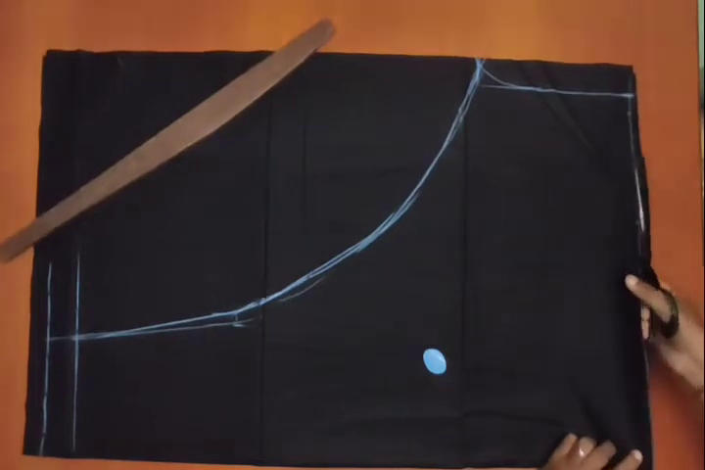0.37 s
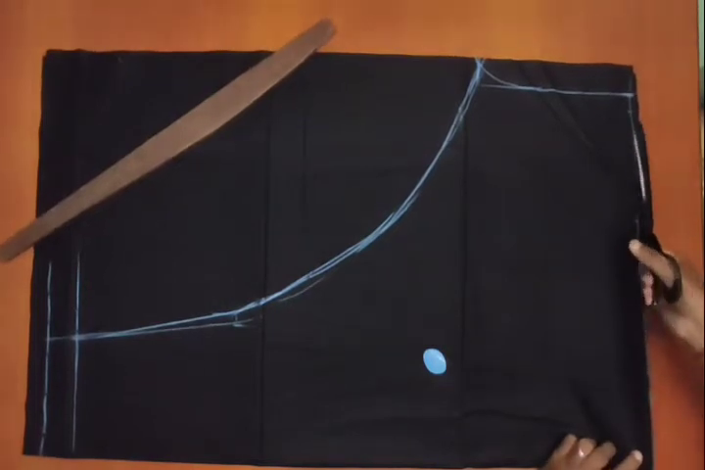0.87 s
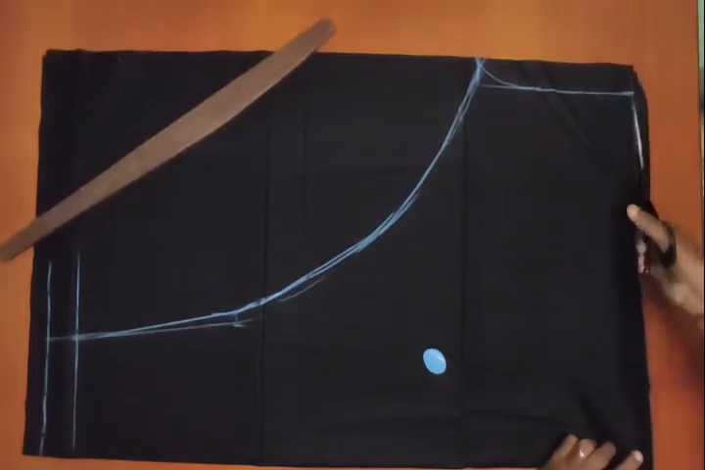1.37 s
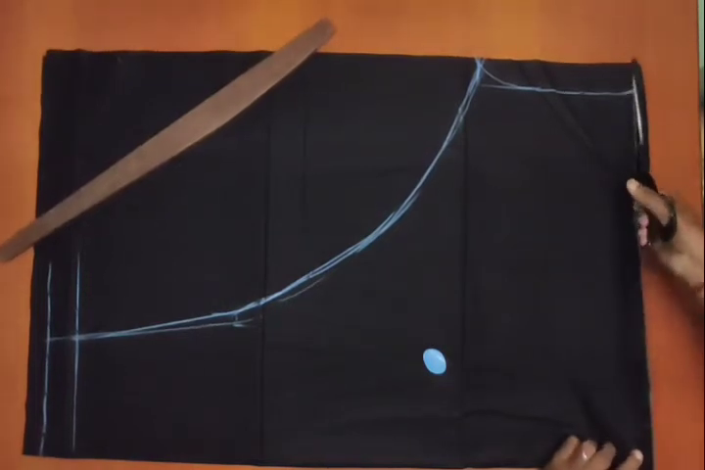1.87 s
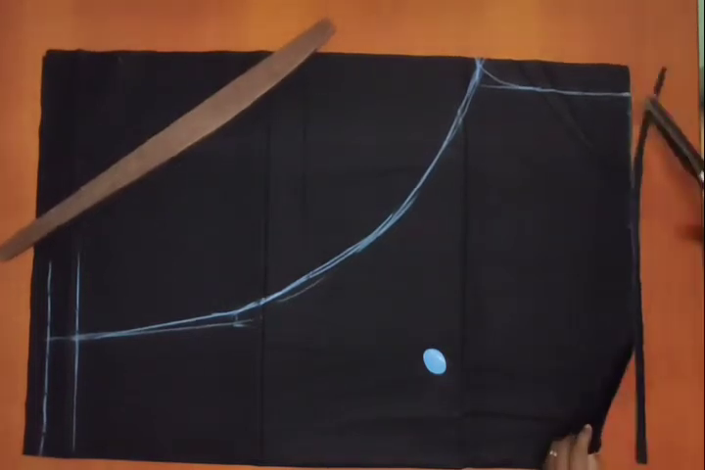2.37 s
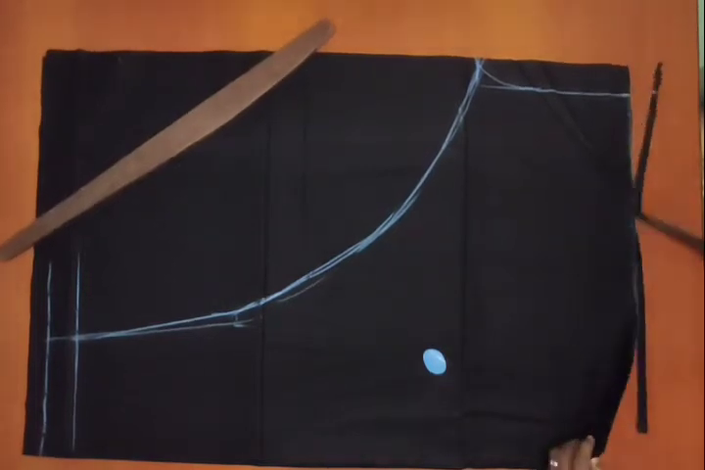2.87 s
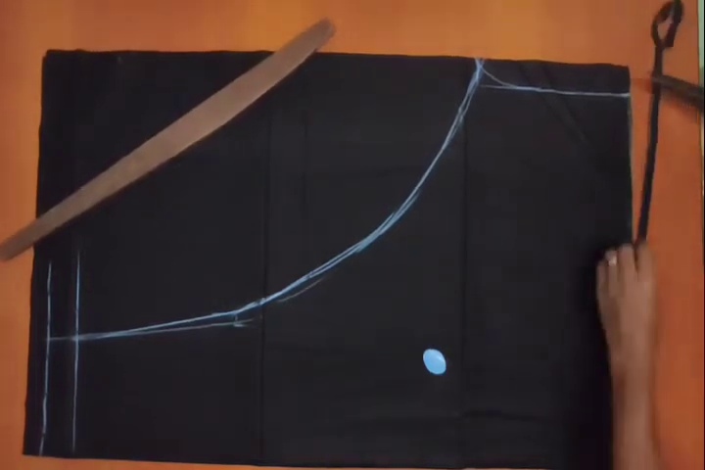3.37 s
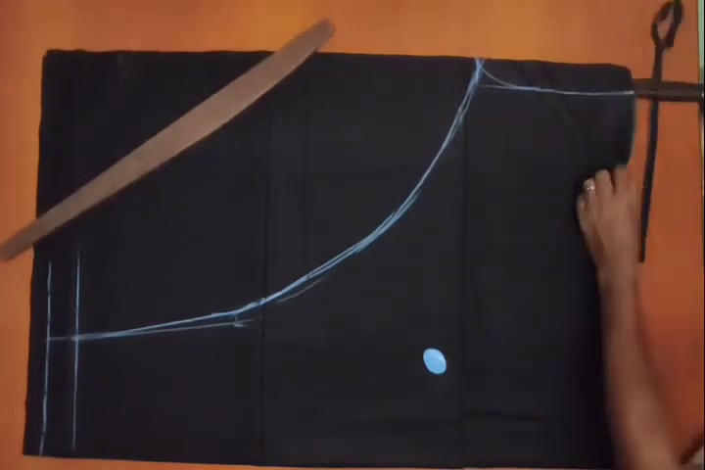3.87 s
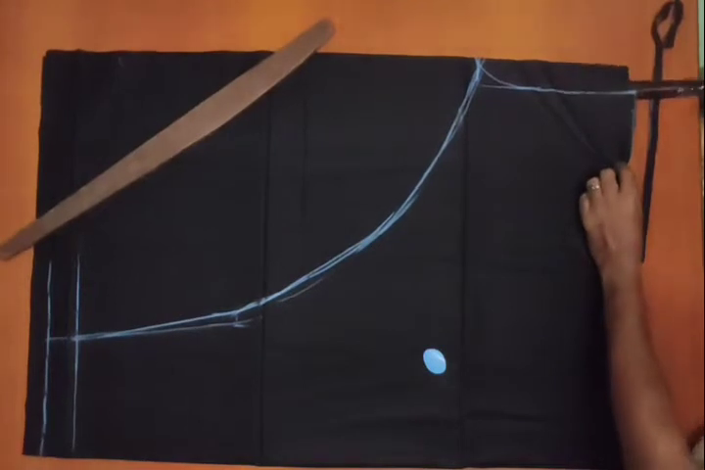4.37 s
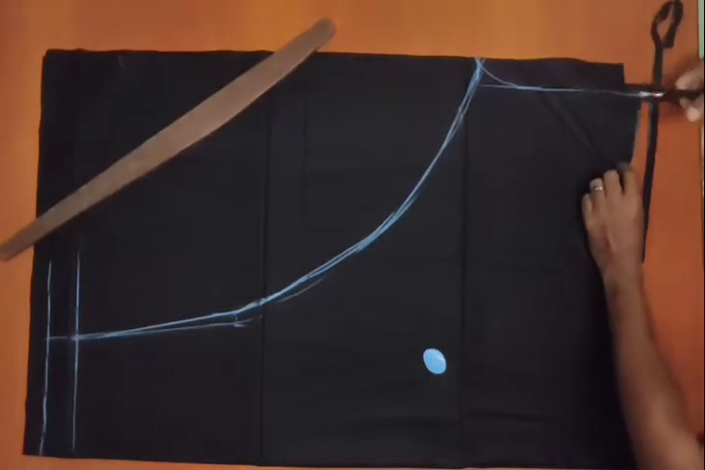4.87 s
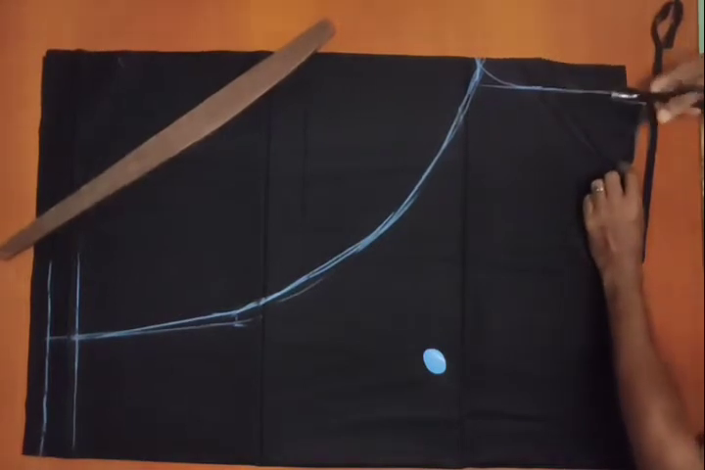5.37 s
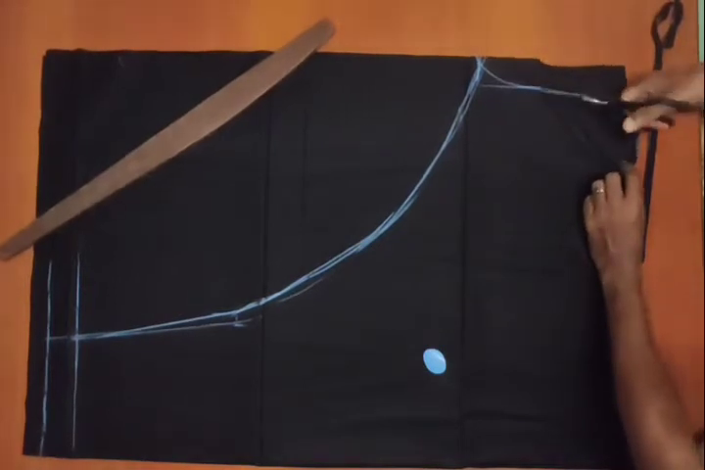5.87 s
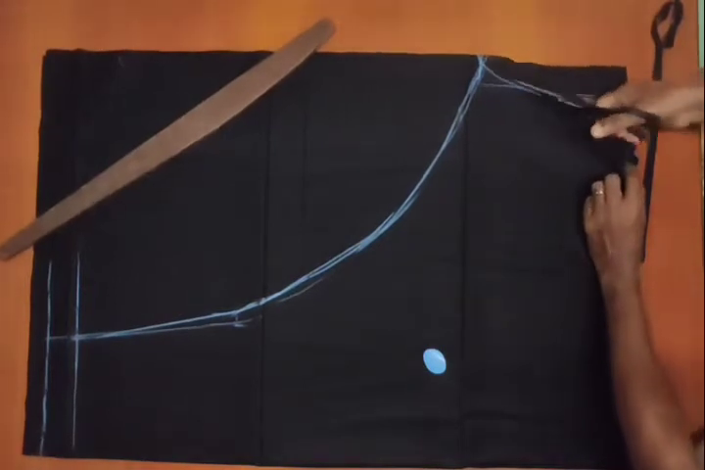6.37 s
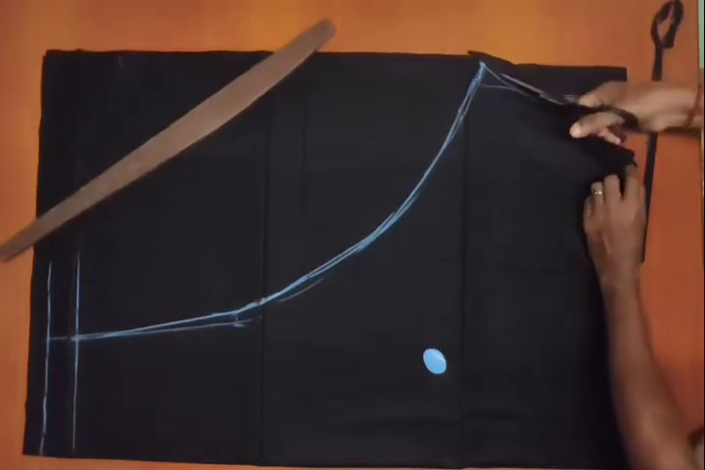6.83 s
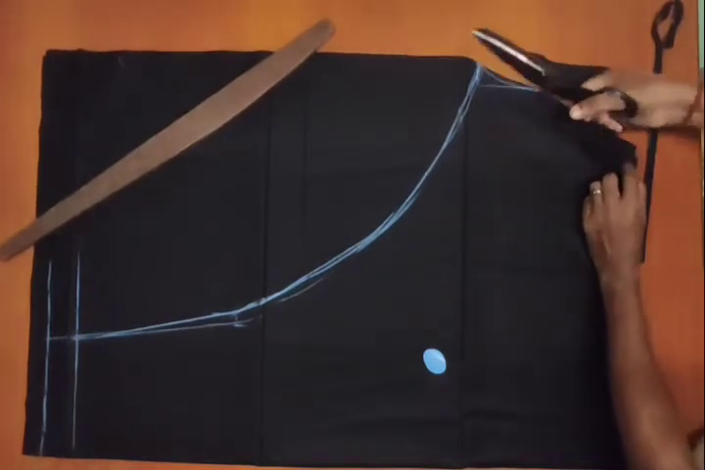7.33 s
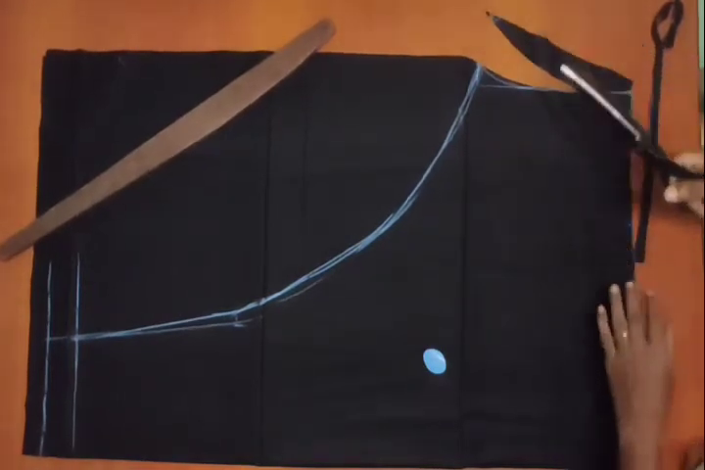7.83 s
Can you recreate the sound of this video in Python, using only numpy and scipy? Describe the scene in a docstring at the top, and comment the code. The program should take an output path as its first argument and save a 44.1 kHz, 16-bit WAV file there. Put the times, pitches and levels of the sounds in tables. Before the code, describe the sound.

In a small quiet room, steel scissors cut folded cloth while resting on a wooden table, heard from just above in stereo. From 0 to 2.1 s there are five short crunching cuts, at about 0.35, 0.8, 1.25, 1.7 and 2.05, each under a tenth of a second, with threads popping, blades hissing and lighter opening scrapes between most. Sharp snaps of tips on wood sound at 1.77 and, harder, 2.07. Cloth rustles from 2.1 to 2.9, with a bright clack at 2.64, then sparse ticks and small slides, and a knock at 3.76. From 4.2 the cuts resume every 0.45 s, woodier and heavier, with low table thumps and quiet scrapes between. The final cut at 7.3 ends in the loudest snap with a brief steel ping; a soft rustle fades into faint room tone and a barely audible steady hum.

```python
"""Steel scissors cut folded cloth, the lower blade resting on a wooden table, in a small quiet room.
Breaking threads shake the table modes through the blade; the blades hiss against each other and the cloth.
Tips snap shut as short blows: wood knocks, steel ticks, blade pings. The table also rocks on its legs.
Two spaced microphone ports listen from above, with a short room tail, room tone and a faint late tone."""
import sys
import numpy as np
from scipy import signal
from scipy.fft import rfft, irfft, next_fast_len
from scipy.io import wavfile
from scipy.ndimage import uniform_filter1d, map_coordinates

SR = 44100
rng = np.random.default_rng(int(sys.argv[2]) if len(sys.argv) > 2 else 0)


def store_wav(level_fs):
    """Save 16-bit WAV to argv[1]."""
    pcm = np.round(np.clip(np.atleast_2d(level_fs), -1, 1) * 32767)
    wavfile.write(sys.argv[1], SR, pcm.T.astype(np.int16))


def level_to_linear(level):
    """Convert decibel levels to linear amplitude factors, elementwise."""
    exponent = np.asarray(level, float) / 20
    return 10 ** exponent


N = 351477

# Levels in the tables are relative: filters, groups and the final balance act on top of them.
# Room tone spectrum, scaled as a whole later: centre_hz, level_db (per Hz)
ROOM_TONE = [(12, -4), (20, 13.5), (45, -2), (106, -7), (289, -4.5), (362, -10), (534, -8.5), (631, -11.5),
             (2470, -23), (4070, -27.5), (8880, -31.5), (11400, -84), (13100, -29), (15500, -68)]
# Likeness of the room tone at the two ports: freq_hz, likeness (0-1)
TONE_ALIKE = [(60, 0.1), (240, 0.67), (950, 0.067), (3770, 0.14), (15000, 0.68)]
# Hand and scissors resting on the table: time_s, force_db
REST = [(0, -50.5), (2.2, -55.5), (2.4, -100), (3.7, -83), (4.0, -51), (7.4, -67), (7.55, -76), (7.97, -62)]
# Share of the resting force in the four mode groups: level_db
REST_COLOUR = (-3.5, -14.5, -17.5, -21)
# Faint hiss of cloth brushing the blades between strokes: time_s, level_db
BRUSH = [(0.0, -71), (0.44, -77), (0.58, -68), (1.0, -71), (1.31, -63), (1.44, -66), (1.73, -57),
         (1.88, -72), (2.04, -72), (2.24, -66), (2.51, -77), (3.0, -62), (3.15, -76), (3.37, -67.5),
         (3.79, -63), (4.08, -65.5), (4.3, -68), (4.42, -69), (4.71, -66.5), (5.13, -63), (5.66, -81),
         (6.39, -68.5), (7.19, -81), (7.43, -73), (7.59, -75.5), (7.97, -62)]
# Steel and cloth sliding over the table:
# start_s, length_s, force_db, brightness_db, hiss_db, peak_share (of length), highest_modes_db
SLIDES = [(-0.03, 0.025, -38, 10.5, -51, 0.23, -21), (.26, 0.062, -56, 8.5, -64, 0.13, -2.5),
          (0.76, 0.023, -50, 9, -60, 0.69, -6), (1.16, 0.19, -60, 10, -83, 0.27, -4),
          (2.228, 0.059, -43, 11.5, -52, 0.83, -6.5), (2.908, 0.2, -43, 8, -45.5, 0.52, 7.5),
          (3.590, 0.12, -57, 9, -66, 0.22, -0.5), (3.778, 0.04, -39.5, 14.5, -56, 0.17, -7),
          (3.864, 0.11, -31.5, -21.5, -69, .75, 2), (4.0, 0.062, -46, -21, -67.5, 0.6, 0),
          (4.505, 0.051, -42, 0, -60.5, 0.12, 0), (4.955, 0.095, -38.5, -1, -64, .5, 5.5),
          (5.430, 0.032, -39.5, 2.5, -63.5, 0.17, 0.5), (5.865, 0.074, -42, 1, -66, 0.17, -1),
          (6.320, 0.074, -41.5, -9, -70.5, .2, 4.5), (6.755, 0.054, -41.5, -32, -67, 0.51, -4),
          (6.862, 0.029, -33.5, -9, -57, .2, -3), (7.297, 0.038, -32, -5, -32.5, 0.46, 14)]
# Blades opening again: start_s, length_s, force_db, brightness_db, hiss_db, peak_share (of length)
OPENINGS = [(0.068, 0.065, -45, 4, -47.5, 0.72), (0.520, 0.058, -46.5, 4, -50.5, .7),
            (0.976, 0.075, -53, 5.5, -51.5, 0.77), (1.428, 0.042, -51.5, -0.5, -50.5, 1),
            (4.412, 0.085, -40, -36, -53.5, 1), (4.890, 0.056, -39.5, 3.5, -52, 0.98),
            (5.333, 0.057, -40.5, 10, -51, 1), (5.765, 0.084, -41, 9.5, -55.5, 1),
            (6.208, 0.041, -38, 5, -53.5, 0.51), (6.662, 0.033, -39.5, 7, -52, 0.5),
            (7.095, 0.016, -43.5, -15, -51.5, 0.92)]
# Closing strokes through the cloth:
# start_s, length_s, force_db, brightness_db, hiss_db, peak_share (of length), bite_db (over the stroke)
CUTS = [(0.327, 0.084, -30.5, 11.5, -45, 0.55, -1.5), (0.786, 0.088, -32, -7.5, -44.5, 0.44, 6),
        (1.236, 0.091, -38.5, 12.5, -45, 0.44, 6.5), (1.701, 0.088, -30, 6, -45, 0.58, 4.5),
        (2.048, 0.066, -36, -0.5, -44.5, 0.43, 8), (4.225, 0.09, -31, -29, -45.5, 0.97, 0),
        (4.675, 0.086, -26.5, -5.5, -48, 0.84, -4.5), (5.105, 0.084, -29, 14.5, -42, 0.45, -1.5),
        (5.556, 0.069, -25, 6.5, -45, 0.44, -1.5), (6.008, 0.088, -29, 12, -44, 0.44, -4),
        (6.45, 0.068, -27.5, 3, -47.5, 0.53, 4.5), (6.884, 0.051, -31, -5.5, -48, 0.85, 9.5),
        (7.269, 0.077, -23, -4.5, -54, 0.46, 6.5)]
# Cloth rustling on the blades, clear of the table: start_s, length_s, hiss_db
RUSTLES = [(2.11, 0.11, -43.5), (2.402, 0.044, -44.5), (2.53, 0.05, -50.5), (2.662, 0.022, -37),
           (2.817, 0.14, -54.5), (3.527, 0.037, -45.5), (7.449, 0.13, -51)]
# Course of a stroke, wood row then hiss row: attack_s, start_db, end_db, release_db_per_s;
# the hiss row adds peak_share (of length). Attack and share are limited in course().
SLIDE_SHAPE = (-0.03, -5.5, -6.5, 400), (-0.05, 0, 1.5, 331, 15)
OPEN_SHAPE = (0.1, -4, -6, 440), (-0.8, -1.5, -9, 138, 0.56)
CUT_SHAPE = (0.05, -15.5, -4, 402), (-0.05, -3.5, 1.5, 491, 3.7)
# Course of a rustle, one row with the hiss columns
RUSTLE_SHAPE = (-0.9, -11.5, -8.5, 268, .5)
# Share of the force in the four mode groups, a row near the side edge, a row across the cloth: level_db
SLIDE_COLOUR = (0, 3.5, -1.5, -4.5), (0, -4, -7, -8)
OPEN_COLOUR = (0, 10, 1.5, -10.5), (0, -6, -10.5, -23.5)
CUT_COLOUR = (0, 1, -9, -29.5), (0, -2, -7.5, -40)
# Part of the brightness that each of the four mode groups takes, in strokes and in knocks: factor
STROKE_TILT = (0.006, 0.24, 1, 0.97)
KNOCK_TILT = (0.024, 0.54, 0.84, 0.9)
# Higher mode groups swell and fade more steeply along a stroke: exponent on the power, per group
SWELL = (.95, 1.1, 1.3, 1.45)
# Tips snapping shut, steel knocking on wood, small ticks: time_s, blow_db, brightness_db, tick_db, ping_db
KNOCKS = [(0.119, -47, 18, -61, -70), (0.367, -48, 18, -49, -65), (0.407, -37, 13, -40, -42),
          (0.833, -31.5, -8, -52, -66), (0.886, -54, -5, -31, -33), (1.271, -31.5, 10, -50, -62),
          (1.321, -51, 8, -31.5, -50), (1.479, -48, 11, -95, -31.5), (1.6102, -35, 19.5, -45, -74),
          (1.7660, -25, 5, -24, -31), (1.908, -64, -12, -58, -40.5), (2.0728, -17.5, 0, -10.5, -20.5),
          (2.5477, -66, 25, -30, -71), (2.6412, -21, -4, -11, -9), (2.9063, -36, 18, -54.5, -56),
          (3.0945, -54, 9, -22, -29), (3.241, -54.5, 14.5, -59, -62), (3.303, -66.5, 25, -34.5, -59),
          (3.512, -51.5, 21, -30, -35.5), (3.601, -39, 0, -39, -51), (3.708, -78, 13.5, -37, -37.5),
          (3.763, -21, 23, -18.5, -49), (4.249, -23.5, -38, -32, -61), (4.703, -24.5, -7.5, -31, -51),
          (5.148, -27.5, 10, -50, -58), (5.587, -22, 3, -55, -67), (5.754, -65, 24, -39.5, -48),
          (6.0366, -25.5, 9.5, -55, -57), (6.484, -31.5, 15.5, -54, -62), (6.535, -44, 16, -54, -62),
          (6.94, -28, -18, -54, -62), (7.192, -29.5, -8, -50, -64), (7.315, -11, -5, -7, -11.5)]
# Share of a knock in the four mode groups: level_db
KNOCK_COLOUR = (3.5, -6, -7, -14)
# Bite that opens each cut, over its stroke, in the four mode groups: level_db
BITE_COLOUR = (0.5, -3, -2.5, -8)
# Table top, four groups of modes: centre_hz, width_hz, side_edge_db, corner_db, far_edge_db
TABLE_MODES = [
    [(217.4, 13, -3, -24, -14), (241.5, 34, 2.5, 7.5, -7), (267.2, 16, 4.5, 5, 2), (300.3, 14.2, 6, 8, 3.5),
     (352, 3.5, -29, -29.5, -25), (390.5, 10, -1, -28, -32)],
    [(441.3, 77, 2, 5.5, -4), (469, 32.6, 5, 7, 4), (499, 19.3, 1, 3.5, 6.5), (567, 18.4, 2.5, 9.5, 5.5),
     (622, 25.7, -1, 3.5, -2), (732.5, 27.5, 3, 3.5, 2.5), (809, 36.6, 0, 2.5, -1),
     (867.5, 21.6, 0, 1.5, 0.5)],
    [(942, 100, -0.5, -4.5, -9.5), (1068, 33, 8.5, 11, 9.5), (1132, 95, 4.5, 10.5, 7),
     (1222, 24, 6.5, 8, 6), (1227, 21, 1, -0.5, -8), (1319, 126, 5, 8, 4), (1364, 19, 5, 12.5, 5),
     (1493, 52, 5.5, 12.5, 3.5), (1591, 34, -3, 7, -3.5), (1682, 195, -5.5, -3, -10)],
    [(1740, 38, 8, -4, 13), (1870, 220, -1, 8, 2.5), (2126, 49, 6, 13.5, 12), (2263, 89, 3, 12, 3),
     (2472, 62, 7, 8, 9), (2570, 420, -1, 6, -2.5), (3080, 1300, -7.5, -22, -12)],
]
# When the blade goes on to the next place on the table: time_s
MOVES_S = (3.4, 5.95)
# Whole table rocking on its legs: centre_hz, width_hz, level_db
LEG_MODES = [(118, 24, 0), (93, 30, -6)]
# Pushes that rock the table on its legs: time_s, level_db
ROCKS = [(0.389, -45), (0.834, -49), (1.278, -56.5), (1.769, -49.5), (2.083, -55), (2.636, -50.5),
         (3.619, -49.5), (3.771, -56), (4.255, -53.5), (4.709, -49), (5.156, -50.5), (5.599, -45),
         (6.052, -46), (6.488, -43.5), (6.901, -44), (7.327, -35)]
# Broad colour of the blade hiss: freq_hz, level_db (per Hz)
STEEL = [(1180, -66.5), (2000, -12.5), (2270, -12), (2940, -14.5), (4040, -12.5), (4630, -13.5),
         (5450, -8.5), (7230, -7), (8010, -2.5), (9270, -3.5), (11500, -18.5), (13900, -25.5), (15500, -38)]
# Blade ringing, peaks on that colour: centre_hz, width_hz, level_db
BLADE_PEAKS = [(5550, 260, -0.5), (7340, 410, 3.5), (9130, 650, 4.5), (9030, 110, 0)]
# Edges scraping: centre_hz, width_hz, level_db
SCRAPE_MODES = [(5250, 350, 0), (5310, 480, -2)]
# Course of the scrape, one row with the hiss columns
SCRAPE_SHAPE = (4.4, -27.5, -1.5, 450, 4.5)
# Colour of ticks against the hiss: freq_hz, level_db
TICK_TOP = [(9000, -1.5), (13000, 1)]
# Struck blade: centre_hz, width_hz, level_db
PING_MODES = [(7700, 120, 7.5), (7854, 75, 12.5), (8570, 750, -0.5), (8830, 340, 4.5)]
# Level between the microphone ports: freq_hz, left_minus_right_db
LEAN = [(60, 9), (110, 1), (200, 9), (380, 3), (700, 4), (1290, 3.5), (2380, -1), (4400, -1.5), (8120, -3),
        (15000, 11)]
# Phase between the microphone ports: freq_hz, left_lead_rad
LEAD = [(0, 0), (250, -.5), (600, -1.3), (950, -0.9), (1550, -5), (1810, -4.5), (2070, -4.5), (4650, -5),
        (7580, -2.0), (8700, 2.5), (9650, 1.4), (13000, 5.5), (14400, 4), (15800, -1)]
# Room decay: freq_hz, t60_s
DECAY = [(150, 0.26), (600, 0.11), (2000, 0.16), (9000, 0.083)]
# Likeness of the room tail at the two ports: freq_hz, likeness (0-1)
TAIL_ALIKE = [(150, 0.9), (600, 0.3), (2000, 0.08)]
# Faint tone near the end, before its waver: time_s, peak_db
LATE_TONE = [(7.47, -89), (7.56, -68), (7.97, -64)]


def unit(x):
    """Scaled to rms 1."""
    return x / np.sqrt(np.mean(x ** 2) + 1e-20)


def along(points, hz):
    """(Hz, value) points read on a log frequency axis."""
    f, v = np.transpose(points)
    return np.interp(np.log(hz + 1), np.log(f + 1), v)


def filtered(x, response):
    """x times a complex response of frequency, padded so that ringing does not wrap round."""
    m = 2 * next_fast_len(N // 2 + SR // 4)
    return irfft(rfft(x, m) * response(np.fft.rfftfreq(m, 1 / SR)), m)[..., :N]


def modes(table, sign=-1):
    """Causal response of resonances, power gain 1 for white noise; in-phase modes (sign 1) speak at once."""
    def response(f):
        total = 0
        for k, (centre, width, db) in enumerate(table):
            damping = 1j * f * width
            total = total + sign ** k * level_to_linear(db) * damping / (centre * centre - f * f + damping)
        return total / np.sqrt(np.mean(np.abs(total) ** 2))
    return response


def room_tone():
    """Steady noise of the quiet room: likeness at the ports sets the balance of mid and side."""
    level_db, left_db = -57.5, 1.2  # level of the mid part; left up and right down by left_db

    def mid_side(f):
        turn = np.arccos(np.clip(along(TONE_ALIKE, f), -1, 1)) / 2
        return level_to_linear(along(ROOM_TONE, f)) * [np.cos(turn), np.sin(turn)]
    mid, side = filtered(rng.standard_normal((2, N)), mid_side)
    lean = level_to_linear([[left_db], [-left_db]])
    return level_to_linear(level_db) * lean * np.array([mid + side, mid - side]) / np.std(mid)


def course(start, length, attack, start_db, end_db, release, share):
    """Power along one stroke: attack, swell to the peak, sag, release."""
    lead_in_db = -16  # where the attack begins, against start_db
    attack = np.clip(attack, .002, .08)
    peak = np.clip(share, .05, .95) * length
    at = start + np.array([-attack, 0, peak, length, length + .25])
    db = [start_db + lead_in_db, start_db, 0, end_db, end_db - release / 4]
    t = np.arange(0, N, 32) / SR
    return level_to_linear(2 * np.interp(t, at, db, left=-150, right=-150))


def groups(rows, colours):
    """Level of each stroke in the four mode groups, from its force, brightness and place on the table."""
    across_from_s = 3.4
    return np.array([db + np.add(colours[int(s > across_from_s)], bright_db * np.array(STROKE_TILT))
                     for s, _, db, bright_db, *_ in rows])


def cloth_on_blades(t):
    """Power of cloth brushing between strokes, and of rustles clear of the table."""
    power = level_to_linear(2 * np.interp(t, *np.transpose(BRUSH)))
    for s, length, db in RUSTLES:
        power = power + level_to_linear(2 * db) * course(s, length, *RUSTLE_SHAPE)
    return power


def strokes():
    """Force on each mode group, strength of hiss and of edge scrape, all strokes added as power."""
    judder_per_s, judder_db = 95, 3.5  # the cutting force comes in uneven jerks
    scrape_db = -10  # over the hiss of the cut
    t = np.arange(0, N, 32) / SR
    push = level_to_linear(2 * (np.interp(t, *np.transpose(REST)) + np.array(REST_COLOUR)[:, None]))
    jerks = level_to_linear(2 * judder_db * map_coordinates(rng.standard_normal(900), [t * judder_per_s]))
    hiss = cloth_on_blades(t)
    kinds = ((SLIDES, SLIDE_COLOUR, SLIDE_SHAPE), (OPENINGS, OPEN_COLOUR, OPEN_SHAPE),
             (CUTS, CUT_COLOUR, CUT_SHAPE))
    for rows, colours, (wood, blade) in kinds:
        uneven = jerks if rows is CUTS else jerks ** .2  # other strokes nearly glide
        for (s, length, _, _, hiss_db, share, *last), dbs in zip(rows, groups(rows, colours)):
            if rows is SLIDES:
                dbs = dbs + [0, 0, 0, last[0]]
            swell = course(s, length, *wood, share) ** np.array(SWELL)[:, None]
            push = push + level_to_linear(2 * dbs)[:, None] * swell * uneven
            hiss = hiss + level_to_linear(2 * hiss_db) * course(s, length, *blade) * uneven
    edge = jerks * sum(level_to_linear(2 * (db + scrape_db)) * course(s, length, *SCRAPE_SHAPE)
                       for s, length, _, _, db, *_ in CUTS)
    return [np.interp(np.arange(N) / SR, t, np.sqrt(power)) for power in (*push, hiss, edge)]


def threads(per_s, spread_db, rub, patchy_db, size):
    """Irregular thread breaks over rubbing noise; the colour drifts as the cutting point moves along."""
    breaks = (rng.random(N) < per_s / SR) * rng.standard_normal(N) * level_to_linear(spread_db * rng.standard_normal(N))
    z = signal.stft(unit(breaks) + rub * rng.standard_normal(N), nperseg=size)[2]
    field = uniform_filter1d(rng.standard_normal(z.shape), size=5, axis=0)
    field = uniform_filter1d(field, size=5, axis=1)
    return unit(signal.istft(z * level_to_linear(patchy_db * unit(field)), nperseg=size)[1][:N])


def contacts():
    """Times and levels of all blows: the knocks, and the bite at the start of each cut."""
    bite_late_s = 0.0037  # the threads give way a moment after the blades start to close
    bite_tick_db, bite_ping_db = -1, 6.5  # over the hiss of the cut plus its bite
    s, db, bright_db, tick_db, ping_db = np.transpose(KNOCKS)
    start, *_, hiss_db, _, bite_db = np.transpose(CUTS)
    knocks = db[:, None] + KNOCK_COLOUR + np.outer(bright_db, KNOCK_TILT)
    bites = groups(CUTS, CUT_COLOUR) + BITE_COLOUR + bite_db[:, None]
    times = np.r_[s, start + bite_late_s]
    ticks = np.r_[tick_db, hiss_db + bite_db + bite_tick_db]
    pings = np.r_[ping_db, hiss_db + bite_db + bite_ping_db]
    return times, np.vstack([knocks, bites]).T, ticks, pings


def blows(times, dbs, t60, rise, lasts, steady=0):
    """A short burst of force at every knock, with the energy of its level held for `lasts` seconds."""
    force, t = np.zeros(N + SR), np.arange(SR // 20) / SR
    shape = level_to_linear(-60 * t / t60) * (1 - np.exp(-t / rise))
    for s, db, chance in zip(times, dbs, rng.standard_normal((len(times), len(t)))):
        burst = shape * (steady + chance)  # a one-way push with chatter on it
        force[round(s * SR):][:len(t)] += level_to_linear(db) * burst * np.sqrt(lasts * SR) / np.linalg.norm(burst)
    return force[:N]


def knock_forces(times, knock_db):
    """Blows on the four mode groups: the panel flexes late, the higher groups get shorter blows."""
    thud = blows(times, knock_db[0], 0.0079, rise=0.00017, lasts=0.00036, steady=1.84)
    forces = [np.roll(thud, round(0.003094 * SR))]
    for db, t60 in zip(knock_db[1:], (.0025, .0012, .0008)):
        knock = blows(times, db, t60, rise=0.00008, lasts=0.00068, steady=2.0)
        forces.append(np.roll(knock, round(.0022 * SR)))
    return forces


def legs(push, bite):
    """The whole table rocks on its legs, driven by the lowest-group force and by separate shoves."""
    def rocking(f):
        steep = modes(LEG_MODES)(f) ** 2  # squared for steep skirts
        return steep / np.linalg.norm(steep) * np.sqrt(len(f))
    shove = blows(*np.transpose(ROCKS), .04, rise=.003, lasts=.03)
    return filtered(level_to_linear(-38.5) * bite * push + shove, rocking)


def table_top(push, times, knock_db):
    """Thread breaks and knocks drive the same table modes, as heard from three places of the blade."""
    bite = threads(per_s=700, spread_db=4, rub=.7, patchy_db=3.5, size=512)
    place = np.searchsorted(MOVES_S, np.arange(N) / SR)
    wood = np.zeros(N)
    for level, knock, group, sign in zip(push, knock_forces(times, knock_db), TABLE_MODES, (1, -1, -1, -1)):
        for k in range(3):
            here = [(centre, width, db[k]) for centre, width, *db in group]
            wood += filtered((level * bite + knock) * (place == k), modes(here, sign))

    def contact(f):
        # the panel radiates little deep bass; cloth between blade and wood softens the contact
        return (1j * f / (150 + 1j * f)) ** 3 / (1 + 1j * f / 4000) ** 2
    return filtered(wood, contact) + legs(push[0], bite)


def steel(f):
    """Colour of blade hiss: a broad spectrum with peaks on top, made causal through its cepstrum."""
    peaks = sum(db / (1 + (2 * (f - c) / w) ** 2) for c, w, db in BLADE_PEAKS)
    cepstrum = irfft(np.log(level_to_linear(along(STEEL, f) + peaks) + 1e-6))
    half = len(cepstrum) // 2
    cepstrum[1:half] *= 2
    cepstrum[half + 1:] = 0
    gain = np.exp(rfft(cepstrum))
    return gain / np.sqrt(np.mean(np.abs(gain) ** 2))


def blade_hiss(hiss, edge):
    """Rubbing noise through the steel colour; the edges scrape as the cut nears the tips."""
    scrape = threads(per_s=3000, spread_db=3.5, rub=.7, patchy_db=3.2, size=512)
    return filtered(hiss * scrape, steel) + filtered(edge * scrape, modes(SCRAPE_MODES))


def blade_blows(times, tick_db, ping_db):
    """Short noise bursts tick in the steel colour and ping the struck-blade modes."""
    tick = blows(times, tick_db, 0.024, rise=0.00076, lasts=0.00063)
    ping = blows(times, ping_db, 0.018, rise=0.0011, lasts=0.0013)
    return filtered(tick, lambda f: steel(f) * level_to_linear(along(TICK_TOP, f))) + filtered(ping, modes(PING_MODES))


def scissors():
    """Strokes and knocks drive the wooden table and the steel blades."""
    *push, hiss, edge = strokes()
    times, knock_db, tick_db, ping_db = contacts()
    wood = table_top(push, times, knock_db)
    return wood, blade_hiss(hiss, edge) + blade_blows(times, tick_db, ping_db)


def ports(x):
    """Direct sound at the spaced microphone ports: level and phase differ between the two."""
    def pair(f):
        half = level_to_linear(along(LEAN, f) / 2) * np.exp(.5j * np.interp(f, *np.transpose(LEAD)))
        return np.array([half, 1 / half])
    return filtered(x, pair)


def room_tail(x):
    """Diffuse tail, each frequency dying at its own speed; most alike at the ports in the bass."""
    hop = SR // 4  # a new tail fades in every quarter second
    x = np.pad(x, (hop + 150, 2 * hop))  # the extra 150 samples delay the tail
    wet = np.zeros((2, N + 6 * hop))
    fade = np.sin(np.pi * np.arange(2 * hop) / (2 * hop)) ** 2
    for at in range(0, N + hop, hop):
        hz, t, z = signal.stft(rng.standard_normal((3, hop)), SR, nperseg=256)
        alike = along(TAIL_ALIKE, hz)[:, None]
        z = np.sqrt(alike) * z[2] + np.sqrt(1 - alike) * z[:2]
        dying = level_to_linear(-60 * t / along(DECAY, hz)[:, None])
        tail = signal.istft(z * dying, SR, nperseg=256)[1][:, :hop]
        part = signal.fftconvolve((x[at:at + 2 * hop] * fade)[None], tail / np.linalg.norm(tail[0]), axes=1)
        wet[:, at:at + part.shape[1]] += part
    return filtered(wet[:, hop:hop + N], lambda f: level_to_linear(np.outer([.5, -.5], along(LEAN, f))))


def late_tone():
    """A faint sine near the end, equal at both ports, its level wavering at random."""
    pitch_hz, waver_db = 557, 1.4
    t = np.arange(N) / SR
    waver = map_coordinates(rng.standard_normal(100), [np.linspace(0, 90, N)])
    level_db = np.interp(t, *np.transpose(LATE_TONE), left=-120) + waver_db * waver
    return level_to_linear(level_db) * np.sin(2 * np.pi * pitch_hz * t)


def scene():
    """Direct sound at the ports, its room tail, the room tone and the late tone."""
    wood, blades = scissors()
    direct = level_to_linear(-1.5) * ports(wood + blades)
    tail = room_tail(level_to_linear(-5.0) * wood + level_to_linear(2.0) * blades)
    return direct + tail + room_tone() + late_tone()


def top_cut(x):
    """Nothing passes above the cut-off."""
    return signal.sosfilt(signal.butter(12, 16320, fs=SR, output="sos"), x)


def record(dry):
    """The finished mix from the two ports, cut off steeply at the top."""
    top_hz = 15520
    mix = filtered(dry, lambda hz: hz < top_hz)
    return top_cut(mix)


dry = scene()
out = record(dry)
store_wav(out)
```